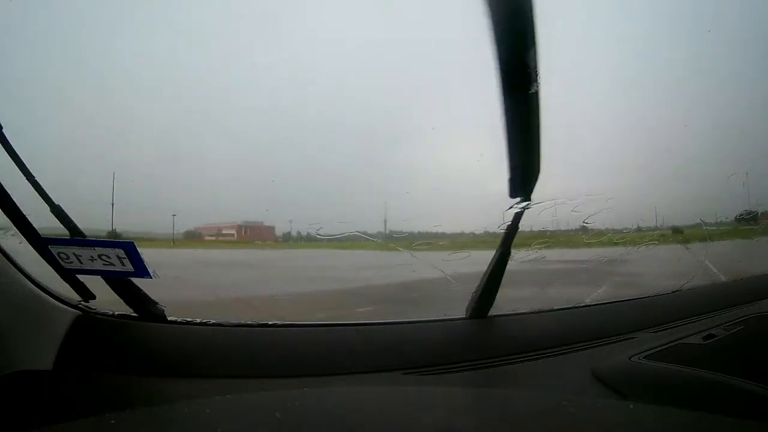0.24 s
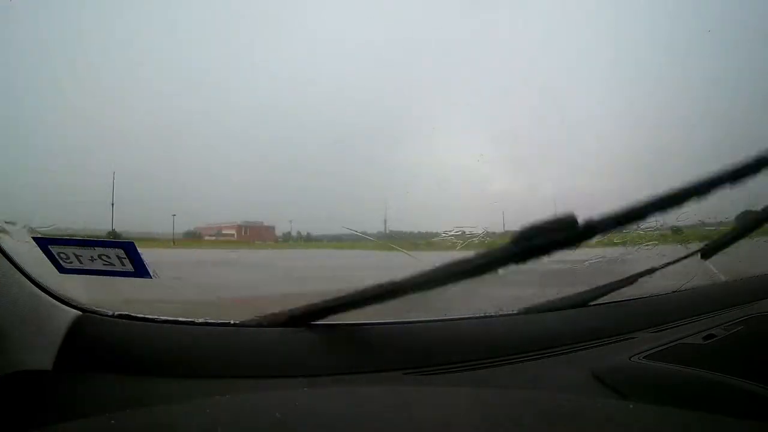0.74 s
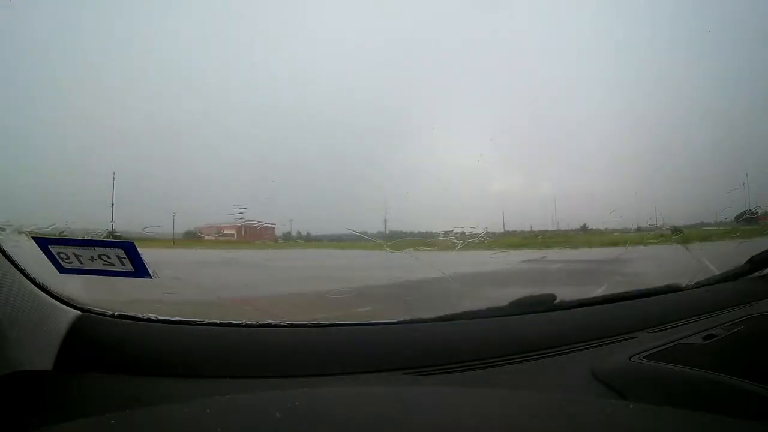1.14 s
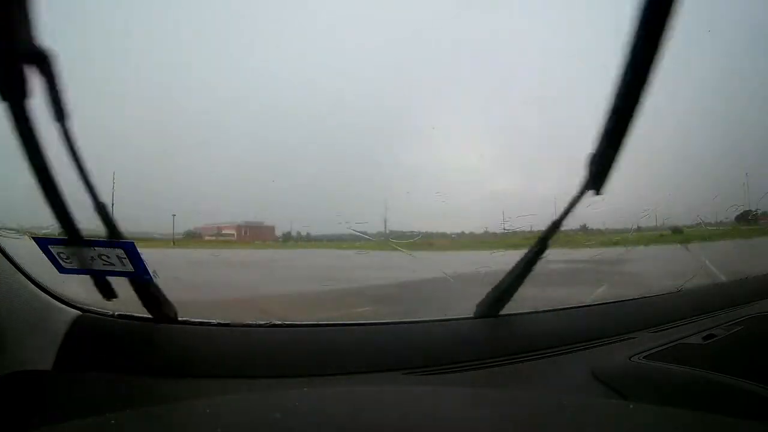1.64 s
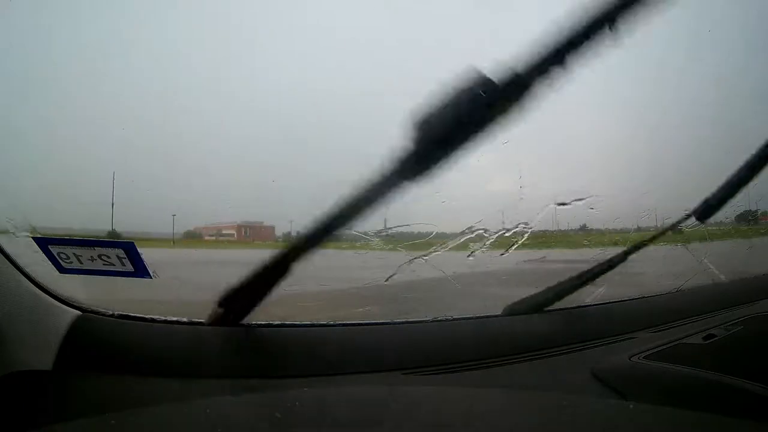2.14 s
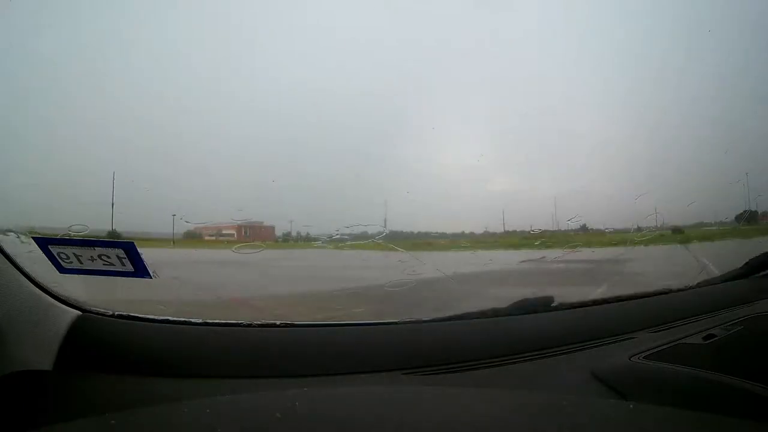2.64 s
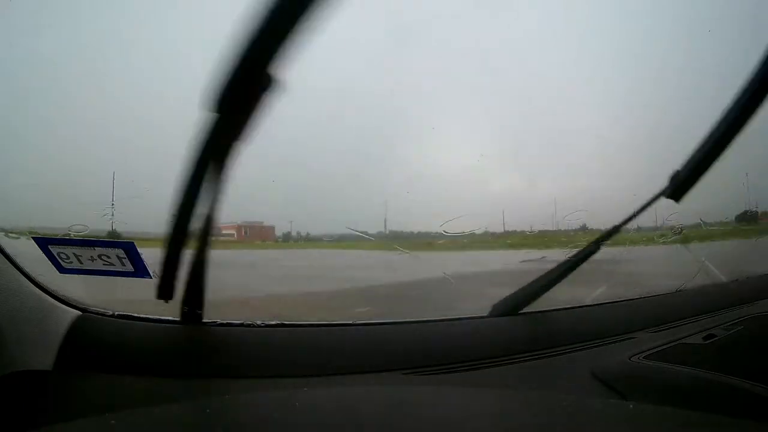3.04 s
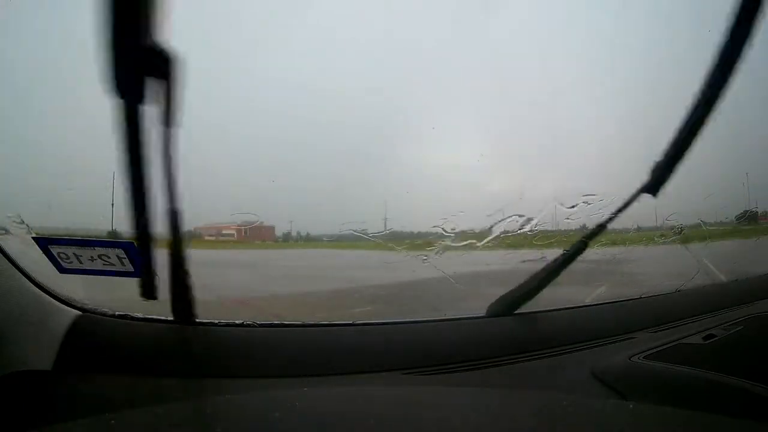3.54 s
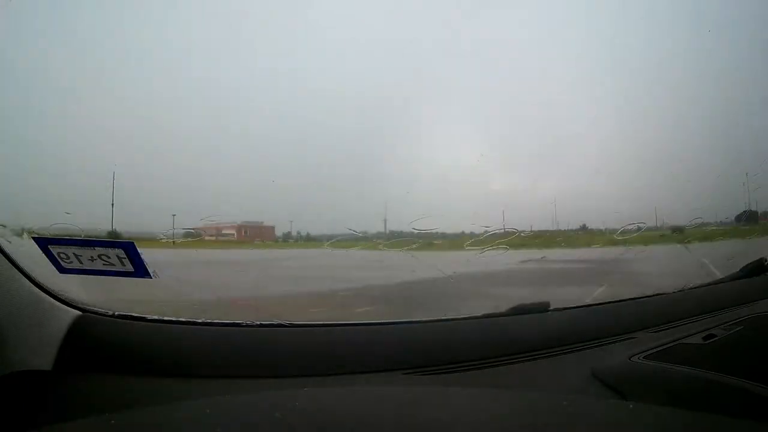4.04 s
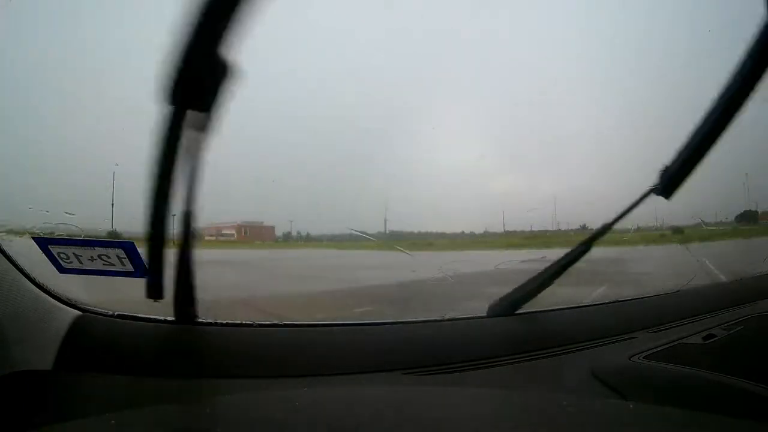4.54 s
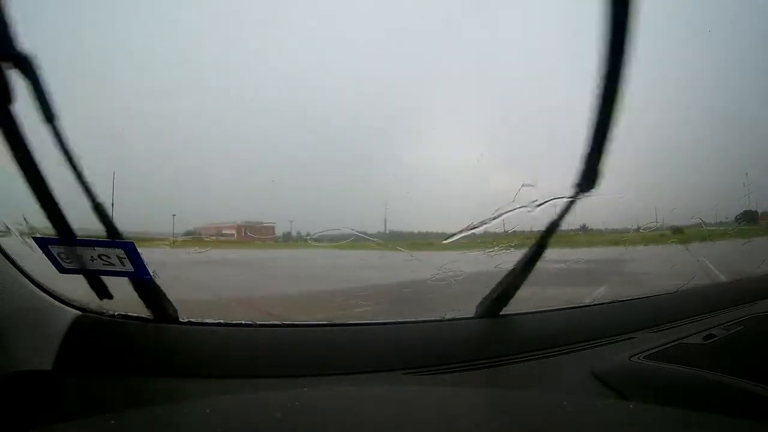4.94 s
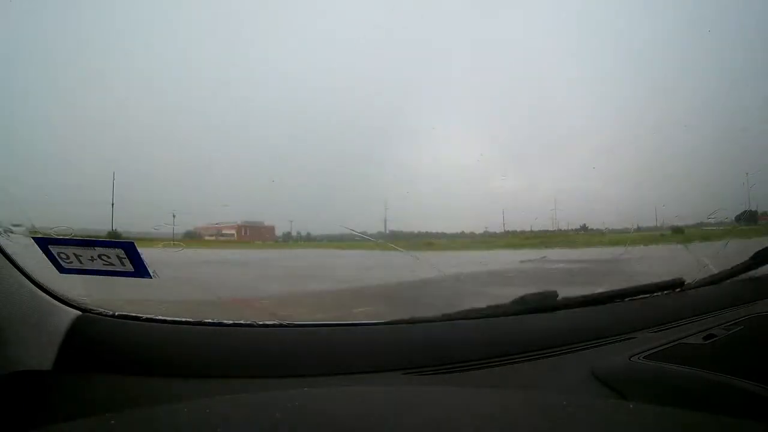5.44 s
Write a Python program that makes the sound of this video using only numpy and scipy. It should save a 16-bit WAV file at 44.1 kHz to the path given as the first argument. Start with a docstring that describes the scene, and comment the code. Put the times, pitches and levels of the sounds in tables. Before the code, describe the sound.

Close, enclosed view from the front seat of a standing car. Dense rain drums dully on the metal roof, swelling and easing slightly, with fainter patter on the glass. Wipers rub low and steadily, thumping softly about every three quarters of a second as the blades reverse. A weak motor hum and deep cabin rumble lie underneath.

```python
"""Rain on a standing car, wipers running

Heard from the front seat: showers of noise bursts drum dully on the roof and patter on the windshield,
with single big drops standing out. Filtered noise makes the low cabin rumble, the almost steady rub of
the wet blades and the groan of their linkage, over a wavering sine for the motor. At each end of the
sweep soft knocks excite the body modes, so the blades thump as they flip."""
import sys
import numpy as np
from scipy import signal
from scipy.fft import rfft, irfft, next_fast_len
from scipy.io import wavfile

SR = 44100
rng = np.random.default_rng(int(sys.argv[2]) if len(sys.argv) > 2 else 0)


def master_out(mix):
    """Clip the mix to full scale and print it as 16-bit PCM to the path in sys.argv[1]."""
    frames = np.transpose(np.atleast_2d(mix))
    ceiling = np.clip(frames, -1, 1)
    pcm = np.round(ceiling * 32767).astype(np.int16)
    wavfile.write(sys.argv[1], SR, pcm)


N = 251811

# Blade flips at the top of the sweep. Each row: time in seconds, strength of the knocks in relative dB.
TOP_TURNS = [(0.405, -21.5), (1.917, -22), (3.431, -23.5), (4.939, -22.5)]
# Blade flips at the foot of the windshield. Each row: time in seconds, strength in relative dB.
FOOT_TURNS = [(1.169, -21.5), (2.677, -21), (4.194, -20)]
# Windshield and cabin modes. Each row: frequency in Hz, 60 dB decay time in seconds,
# relative level in dB when knocked at the top, relative level in dB when knocked at the foot.
BODY_MODES = [(58, 0.26, -27, -17), (86, 0.12, -5.5, 0), (110.4, 0.27, -7.5, 1.5), (111.1, 0.32, -2.5, 1.5),
              (191, 0.077, 9.5, 7.5), (205.9, 0.1, 8.5, 0), (270, 0.048, 5.5, 2), (345.6, 0.16, 2, -6),
              (429, 0.12, 3.5, -22), (489, 0.11, 1.5, -21)]


def from_db(db):
    """Decibels to gain."""
    return 10 ** (np.asarray(db) / 20)


def rms_one(x):
    """Scale to an rms of 1."""
    return x / np.sqrt(np.mean(x ** 2) + 1e-20)


def seconds():
    """The time of every sample in seconds."""
    return np.arange(N) / SR


def in_time(rows):
    """Draw each column of a curve table as straight lines through every sample."""
    s, *columns = np.transpose(rows)
    return [np.interp(seconds(), s, column) for column in columns]


def drift(rate):
    """Smooth random movement with an rms of 1, changing about rate times a second."""
    hz = np.arange(N // 2 + 1) * SR / N
    smoothing = 1 / (1 + (hz / rate) ** 2) ** 2
    return rms_one(irfft(rfft(rng.standard_normal(N)) * smoothing, N))


def colour(x, spectrum):
    """Causal (minimum-phase) filter with the given spectrum, falling steeply above its last point."""
    size = 2 * next_fast_len(len(x))
    hz, db = np.transpose(spectrum)
    bins = 1 + np.arange(size // 2 + 1) * SR / size  # the 1 Hz offset keeps the logarithm finite
    gain = from_db(np.interp(np.log(bins), np.log(hz), db))
    gain = gain / np.maximum(bins / hz[-1], 1) ** 4
    # the causal half of the cepstrum turns the gain into a minimum-phase response
    cepstrum = irfft(np.log(gain))[:size // 2]
    cepstrum[0] /= 2
    response = np.exp(2 * rfft(cepstrum, size))
    return irfft(rfft(x, size) * response)[:len(x)]


def noise(spectrum):
    """Coloured noise, rms 1."""
    return rms_one(colour(rng.standard_normal(N), spectrum))


def ring(force, hz, t60):
    """A damped resonance: a unit click sets a sine of height 1 ringing."""
    r = from_db(-60 / (t60 * SR))
    w = 2 * np.pi * hz / SR
    return signal.lfilter([0, np.sin(w)], [1, -2 * r * np.cos(w), r * r], force + 1e-18)


def add(out, s, sound):
    """Mix a sound in at time s."""
    at = max(round(s * SR), 0)
    out[at:at + len(sound)] += sound[:max(N - at, 0)]


def swells(times, db, attack_s, release_s):
    """A gain that rises exponentially to db at each of the times and dies away."""
    since = seconds() - np.asarray(times)[:, None]
    return from_db(db) * np.exp(-np.maximum(-since / attack_s, since / release_s)).sum(axis=0)


def cabin_rumble():
    """Low-frequency noise fills the cabin at a constant level."""
    # Each row: frequency in Hz, relative spectrum level in dB.
    rumble_colour = [(12, -8), (25, -1.5), (40, 0), (58, 1.5), (76, -5.5), (100, -4), (160, -24),
                     (500, -65)]
    return from_db(-45.5) * noise(rumble_colour)


def splat(t60, cabin_db, cabin_t60=0.11):
    """One spot of a panel answers a drop: a dense, quickly dying ring and the cabin's short tail."""
    t = np.arange(SR // 8) / SR
    fade = from_db(-60 * t / t60) + from_db(cabin_db - 60 * t / cabin_t60)
    return rms_one(rng.standard_normal(len(t)) * fade)


def shower(per_s, spread_db, largest, t60, cabin_db, count=12):
    """Drops, many small and a few large, fall at random on spots that each ring in their own way."""
    sizes = from_db(spread_db * np.minimum(rng.exponential(1, N), largest))
    landed = rng.random(N) < per_s / SR
    drops = sizes * landed * rng.choice([-1, 1], N)
    spot = rng.integers(0, count, N)
    return sum(signal.oaconvolve(drops * (spot == k), splat(t60, cabin_db))[:N] for k in range(count))


def single_drops(rows, spectrum, t60, cabin_db):
    """Drops big enough to stand out of the shower, each at its peak level."""
    out = np.zeros(N)
    for s, peak_db in rows:
        drop = colour(splat(t60, cabin_db), spectrum)
        add(out, s, from_db(peak_db) * drop / np.abs(drop).max())
    return out


def roof(level_db):
    """The sheet metal rings under the unevenly falling drops and the lining takes the treble away."""
    # Each row: frequency in Hz, relative spectrum level in dB.
    roof_colour = [(90, -27.5), (170, -3), (260, 0.5), (500, -0.5), (680, 0), (780, -5.5), (920, -2),
                   (1200, -9), (1490, -8), (1630, -12.5), (2400, -25), (3200, -33), (5000, -41),
                   (8000, -86.5)]
    # Heavy drops. Each row: time in seconds, peak level in dB.
    heavy_drops = [(0.196, -25), (0.578, -27), (0.808, -23), (1.46, -26), (2.352, -32), (2.427, -27.5),
                   (2.894, -26.5), (3.533, -27.5), (3.908, -24.5)]
    drops = shower(per_s=3200, spread_db=4.0, largest=2.36, t60=0.031, cabin_db=-12)
    surge_db = 0.93 * drift(6.4)
    drumming = from_db(level_db + 2.03 + surge_db) * rms_one(colour(drops, roof_colour))
    return drumming + single_drops(heavy_drops, roof_colour, t60=0.075, cabin_db=-10)


def windshield(level_db):
    """Stiff glass gives short ticks, which come in flurries; sparse splashes are sharper and brighter."""
    # Patter on the glass. Each row: frequency in Hz, relative spectrum level in dB.
    glass_colour = [(300, 5.5), (1000, 5), (2000, 8), (2750, 3.5), (3150, -7), (3750, -1.5), (4450, -1),
                    (5300, -16), (6400, -13.5), (7100, -22), (7900, -40), (12000, -59)]
    # Splashing droplets. Each row: frequency in Hz, relative spectrum level in dB.
    splash_colour = [(800, -20.5), (2500, 7.5), (4200, 2.5), (5400, -4.5), (6500, -13.5), (7200, -19),
                     (7900, -38), (13000, -38)]
    # Fat drops. Each row: time in seconds, peak level in dB.
    fat_drops = [(0.597, -35), (0.8205, -39), (1.7864, -45), (1.9, -37.5), (2.2214, -40), (2.4638, -39),
                 (2.7706, -35), (2.8305, -38), (2.9254, -41), (3.0022, -37.5), (3.401, -36), (3.6177, -41),
                 (3.8813, -39), (4.1704, -30), (4.2033, -39), (4.3344, -35)]
    flurries = from_db(2.5 * drift(18))  # quick swings in the number of drops
    drops = shower(per_s=1400 * flurries, spread_db=3.5, largest=5.1, t60=0.013, cabin_db=-10.0)
    splashes = shower(per_s=70 * flurries, spread_db=1.5, largest=2.7, t60=0.0035, cabin_db=-19.5)
    patter = from_db(level_db + 6.0) * rms_one(colour(drops, glass_colour))
    ticks = from_db(level_db - 7.0) * rms_one(colour(splashes, splash_colour))
    return patter + ticks + single_drops(fat_drops, splash_colour, t60=0.007, cabin_db=-17)


def wiper_motor():
    """The motor hums a sine whose pitch and level waver."""
    hz = 118.5 * (1 + 0.022 * drift(4.04))
    hum = rms_one(np.sin(2 * np.pi * np.cumsum(hz) / SR))
    return from_db(-50.5 + 5.7 * drift(1.7)) * hum


def blade_speed():
    """The crank turns evenly, once from top turn to top turn: speed is a sine, positive on the way up."""
    tops = np.transpose(TOP_TURNS)[0]
    return -np.sin(2 * np.pi * (seconds() - tops[0]) / np.diff(tops).mean())


def blade_rubbing():
    """Rubber rubs on wet glass, a touch louder with speed and on the way up."""
    # Each row: frequency in Hz, relative spectrum level in dB.
    rubber_colour = [(70, -31), (115, -11), (150, -0.5), (195, -0.5), (230, -7.5), (265, -5.5),
                     (400, -18.5), (1200, -69.5)]
    speed = blade_speed()
    at_rest = 0.96  # share of the sound left as the blades turn
    upstroke_db = 0.5  # added at full speed upwards, taken off downwards
    speed_gain = at_rest + (1 - at_rest) * np.abs(speed)
    return from_db(-38 + upstroke_db * speed) * speed_gain * noise(rubber_colour)


def linkage_load():
    """The linkage strains as the arms near the top and shudders as it pulls away after each turn."""
    tops, feet = np.transpose(TOP_TURNS)[0], np.transpose(FOOT_TURNS)[0]
    running_freely = from_db(-52)
    strain = swells(tops - 0.12, db=-34, attack_s=0.056, release_s=0.056)
    down = swells(tops + 0.076, db=-34.5, attack_s=0.025, release_s=0.041)
    up = swells(feet + 0.1, db=-32.5, attack_s=0.025, release_s=0.041)
    return running_freely + strain + down + up


def linkage_groan():
    """Low coloured noise groans as loudly as the linkage is loaded."""
    # Each row: frequency in Hz, relative spectrum level in dB.
    groan_colour = [(40, -9.5), (75, -1), (92, 15.5), (106, 16.5), (118, 8), (140, 10.5), (400, -48)]
    return linkage_load() * noise(groan_colour)


def flips(turns, knocks, modes_db, uneven_db=0.4):
    """Soft rubber knocks set the windshield and cabin booming, a little differently on each sweep."""
    force = np.zeros(N)
    for delay, knock_db, soft_hz in knocks:
        clicks = np.zeros(N)
        for s, turn_db in turns:
            click_db = turn_db + knock_db + uneven_db * rng.standard_normal()
            add(clicks, s + delay, from_db([click_db]))
        soften = signal.butter(2, soft_hz, fs=SR, output="sos")
        force += signal.sosfilt(soften, clicks + 1e-18)
    boom = np.zeros(N)
    for k, (hz, t60, _, _) in enumerate(BODY_MODES):
        # neighbouring modes take alternate signs; the close pair near 111 Hz makes the boom swell in slowly
        boom += (-1) ** k * from_db(modes_db[k]) * ring(force, hz, t60)
    return signal.sosfilt(signal.butter(1, 15, "high", fs=SR, output="sos"), boom)


def thumps():
    """Each reversal of the blades thumps and echoes briefly in the cabin."""
    # Knocks within one flip at the top, as the linkage and the two blades go over.
    # Each row: delay in seconds, relative level in dB, softening cut-off in Hz.
    top_knocks = [(-0.0164, 5, 104), (0.0016, 5, 139.4), (0.019, -8, 356), (0.0311, 1, 163),
                  (0.0775, 7.5, 58), (0.096, -19.5, 447)]
    # The same at the foot. Each row: delay in seconds, relative level in dB, softening cut-off in Hz.
    foot_knocks = [(-0.0198, 1.5, 93), (0.0, 0.5, 150), (0.009, 2.5, 268), (0.0309, -4.5, 170),
                   (0.0843, -11.5, 106)]
    _, _, top_db, foot_db = np.transpose(BODY_MODES)
    direct = flips(TOP_TURNS, top_knocks, top_db) + flips(FOOT_TURNS, foot_knocks, foot_db)
    cabin = splat(t60=0.096, cabin_db=-27)
    echo = signal.oaconvolve(direct, cabin / np.linalg.norm(cabin))[:N]
    return direct + from_db(-9.5) * echo


def wipers():
    """The motor hums, the blades rub, the linkage groans under load and each flip thumps."""
    return wiper_motor() + blade_rubbing() + linkage_groan() + thumps()


def scene():
    """Rumble, swelling and easing rain, and wipers at one microphone."""
    # The course of the rain. Each row: time in seconds, roof drumming in relative dB,
    # windshield patter in relative dB.
    rain = [(0.0, -40.5, -56), (0.2, -37, -58), (0.8, -35.5, -55.5), (1.15, -38.5, -61), (1.4, -36.5, -58),
            (1.65, -39, -61), (2.05, -38, -60), (2.28, -36.5, -56.5), (2.6, -38.3, -55.5),
            (2.9, -37.5, -55), (3.13, -40, -57.5), (3.4, -35, -56), (3.58, -38, -56), (3.75, -36.5, -54),
            (4.28, -38, -58.5), (4.55, -38.5, -59.5), (5.3, -35.5, -56.5), (5.71, -37.5, -58)]
    roof_db, glass_db = in_time(rain)
    return (cabin_rumble() + roof(roof_db) + windshield(glass_db) + wipers())[None]


def record(dry):
    """The microphone adds a faint hiss and a steep low-pass cuts the top."""
    # Each row: frequency in Hz, relative spectrum level in dB.
    hiss_colour = [(1000, -1), (9000, 0), (12000, -1.5), (16000, 1.9)]
    low_pass = signal.ellip(10, .1, 90, 15800, fs=SR, output="sos")  # .1 dB ripple, 90 dB stop, cut in Hz
    return signal.sosfilt(low_pass, dry + from_db(-78) * noise(hiss_colour))


dry = scene()
out = record(dry)
master_out(out)
```